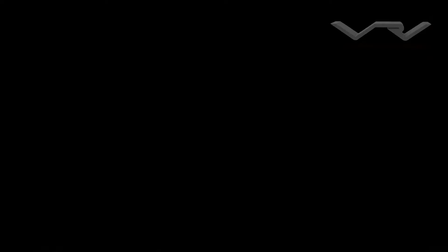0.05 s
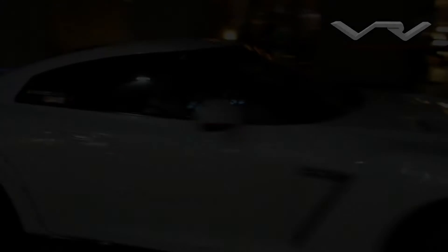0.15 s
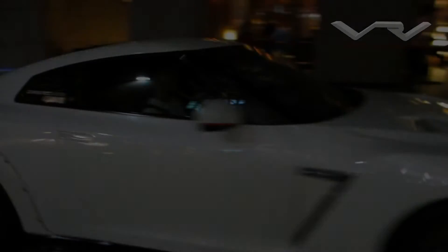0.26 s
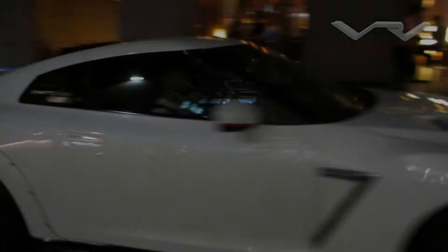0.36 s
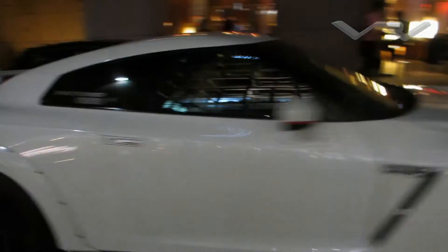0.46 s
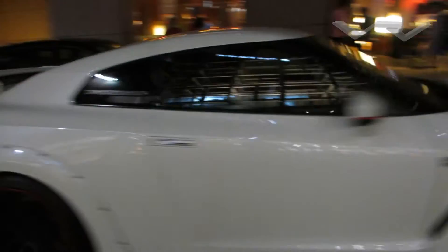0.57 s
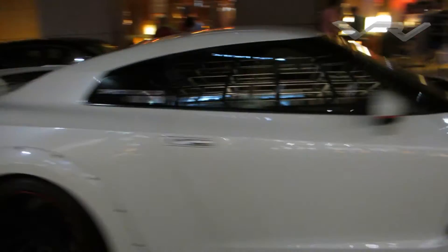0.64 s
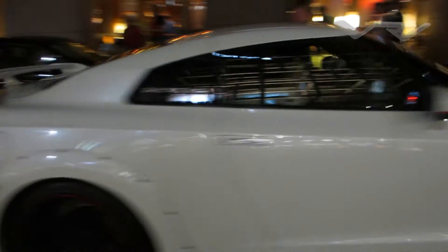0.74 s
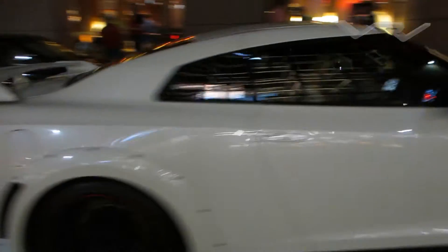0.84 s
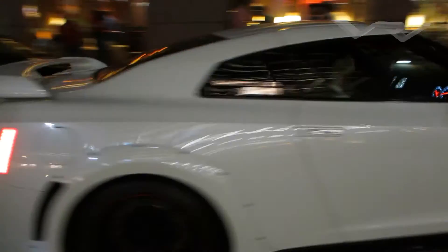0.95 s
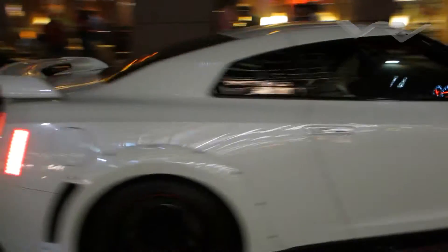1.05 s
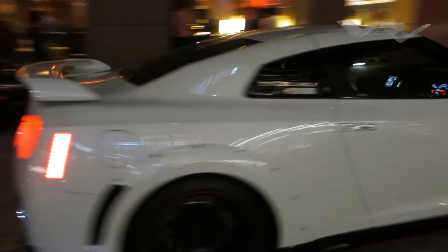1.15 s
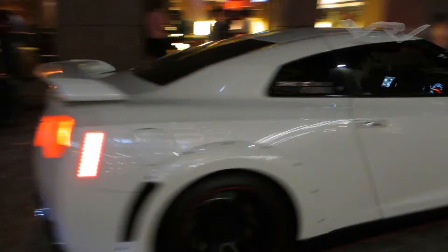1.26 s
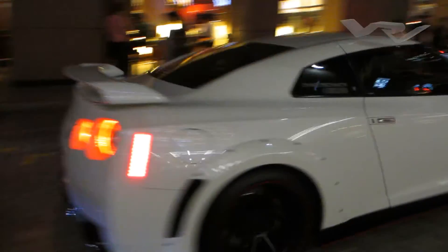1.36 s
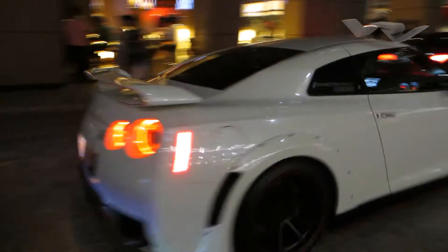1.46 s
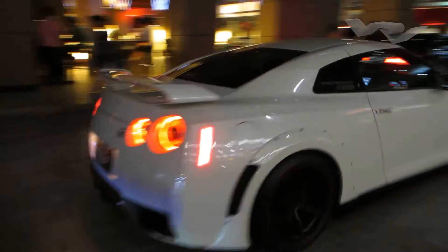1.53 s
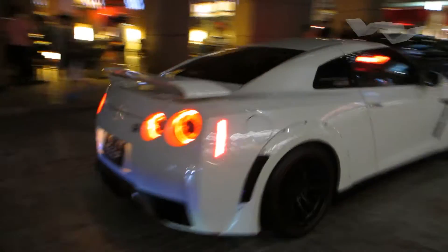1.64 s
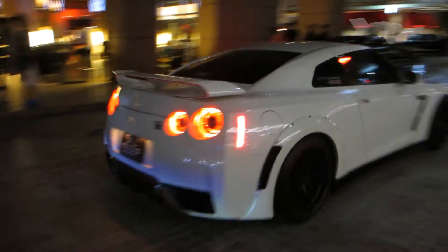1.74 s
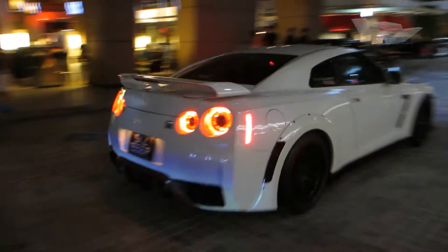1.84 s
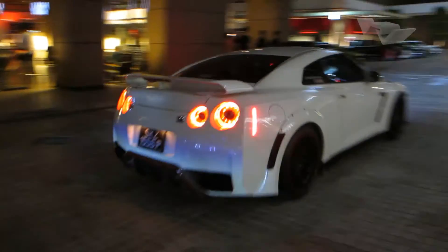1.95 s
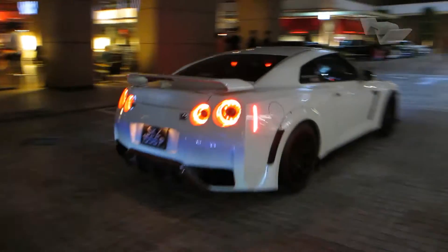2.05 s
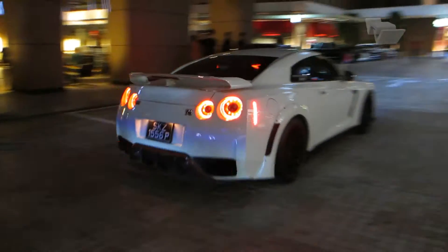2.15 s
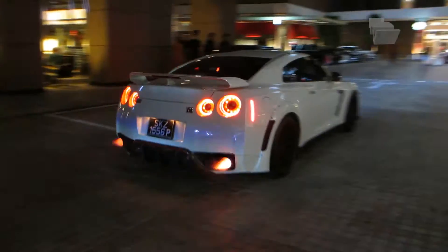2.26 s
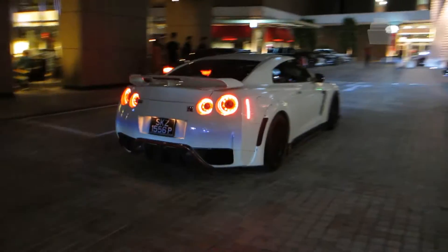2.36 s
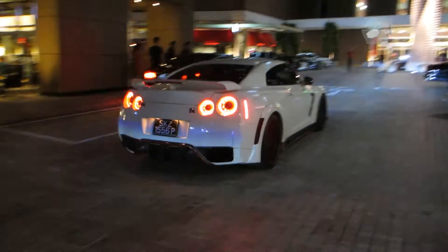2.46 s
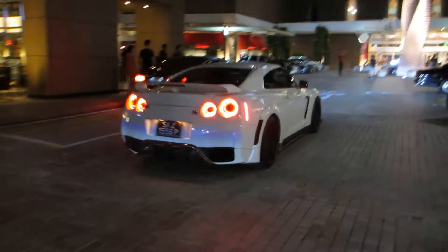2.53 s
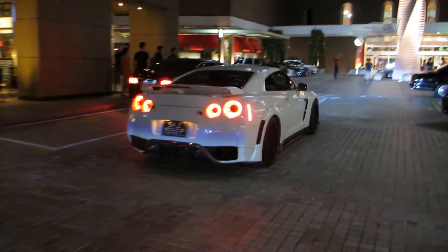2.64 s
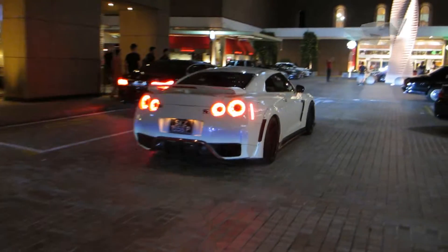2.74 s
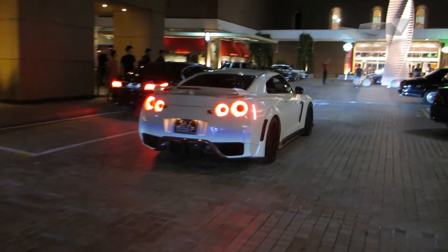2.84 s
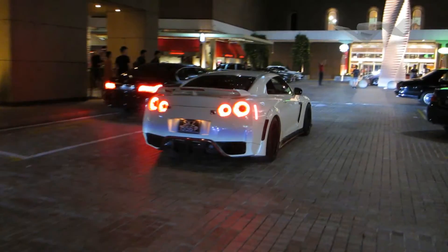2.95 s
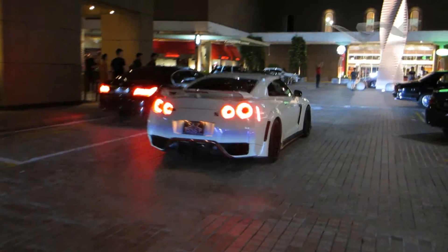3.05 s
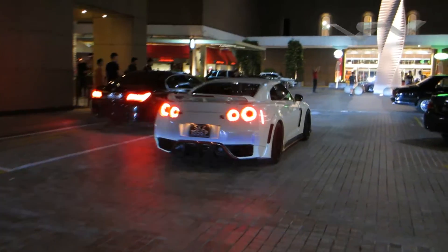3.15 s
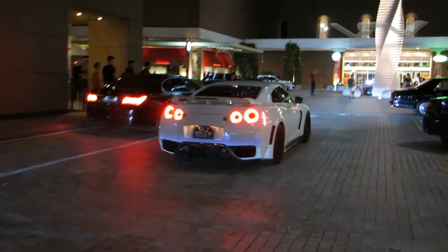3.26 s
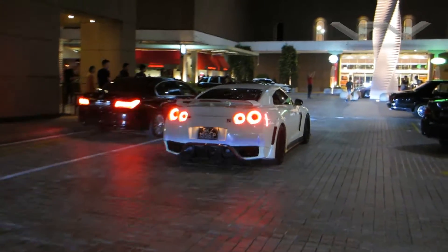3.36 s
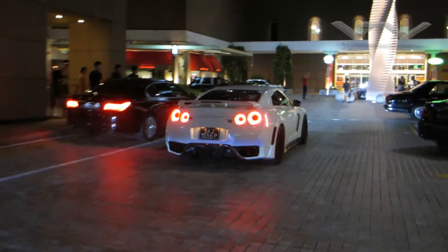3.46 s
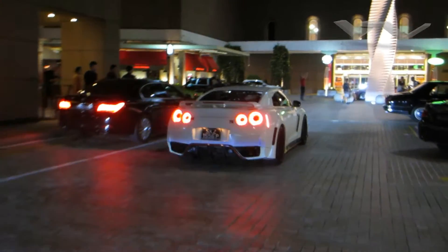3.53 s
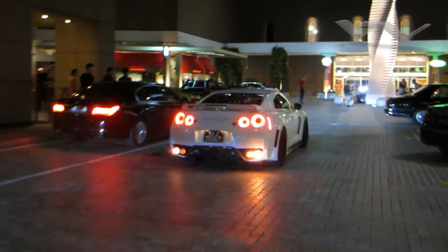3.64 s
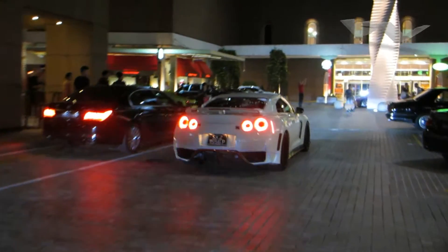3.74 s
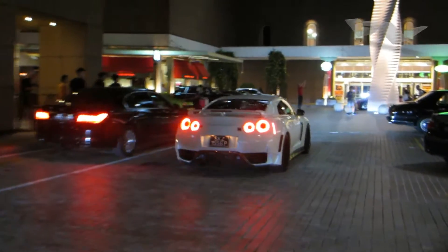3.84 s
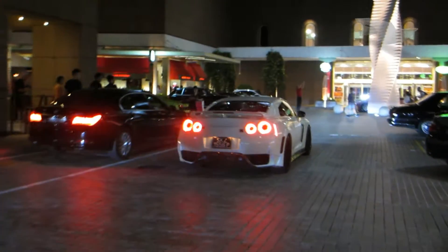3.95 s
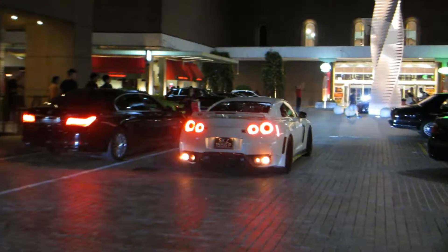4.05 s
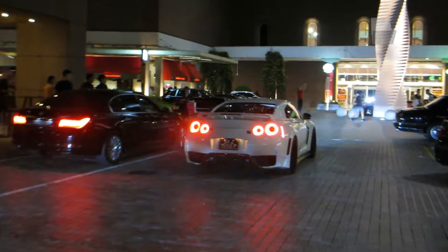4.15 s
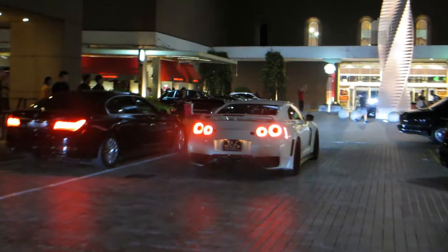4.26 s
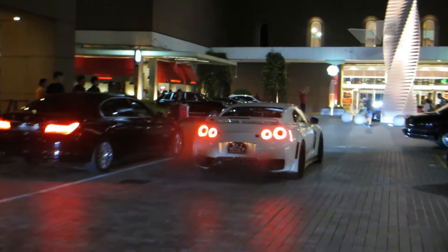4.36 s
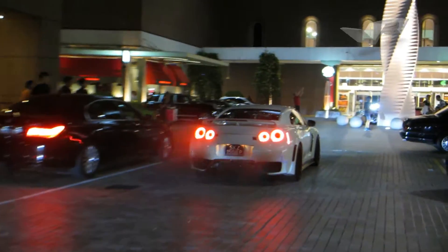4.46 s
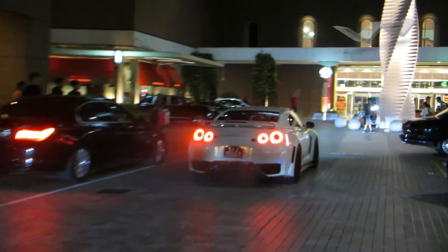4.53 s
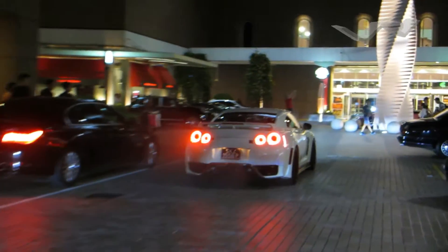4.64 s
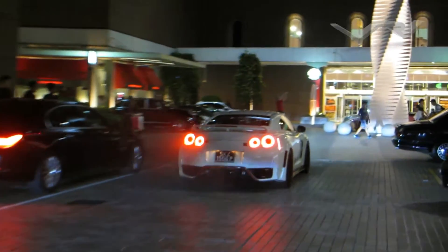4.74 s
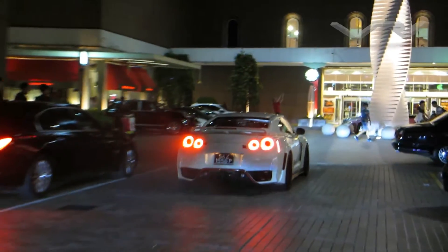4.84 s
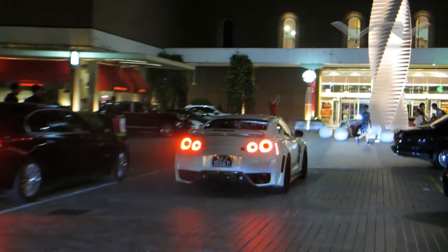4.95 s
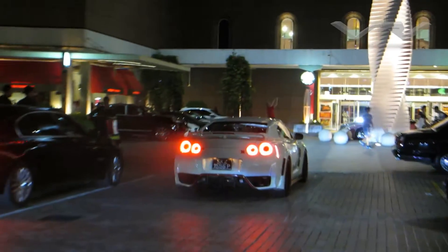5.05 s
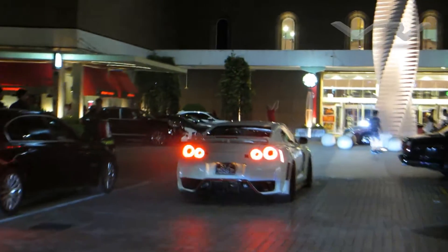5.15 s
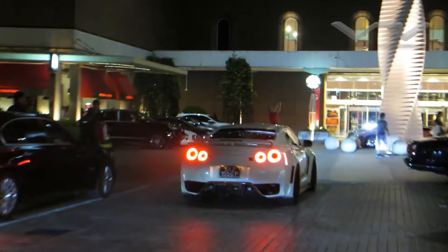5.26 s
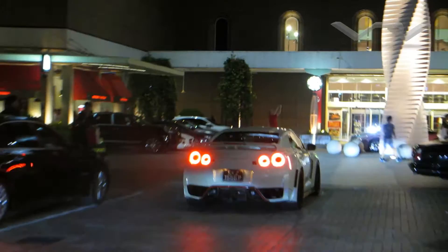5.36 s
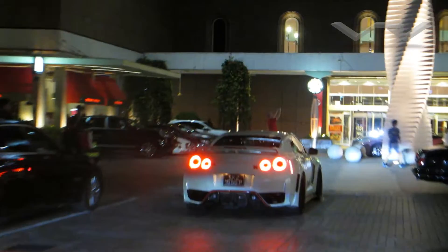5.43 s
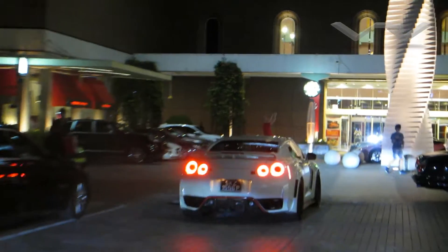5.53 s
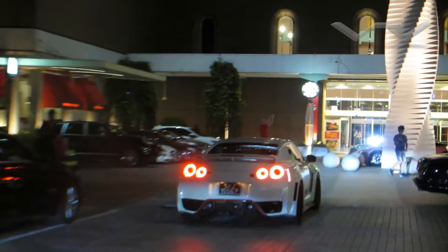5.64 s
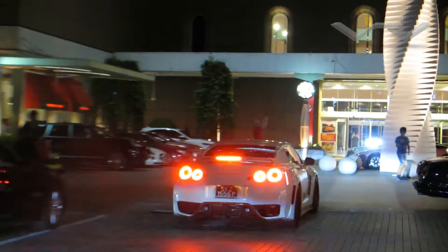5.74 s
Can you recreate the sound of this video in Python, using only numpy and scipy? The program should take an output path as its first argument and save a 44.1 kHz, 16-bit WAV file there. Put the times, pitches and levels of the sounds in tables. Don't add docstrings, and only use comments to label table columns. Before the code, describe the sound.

Silence until about 0.4 s, then a low, lumpy burble fades in over half a second: a turbocharged six-cylinder car creeping close by on paving, with soft tyre hiss and tiny grit ticks around 1 s. From 1 s the revs dip low with a boom, then climb into a hoarse, pulsing, metallic note, peaking near 1.85 s. The throttle lifts and pops and bangs tumble out until 2.45 s, the sharpest cracks at 2.16 and 2.32 s, ringing off buildings. Echoes sink; from 2.7 s a hollower second rev builds to 3.5 s. A longer volley follows, 3.55 to 4.4 s, with heavy bangs near 3.77, 3.9, 4.1 and 4.3 s and hissing gas. A short blip at 4.5 s carries small pops and a thin, high turbine whistle. It recedes to a faint hum, with weak pops and another distant engine near 5.7 s. Small camera, close stereo, clipped peaks.

```python
import sys
import numpy as np
from scipy import signal
from scipy.fft import rfft, irfft, next_fast_len
from scipy.io import wavfile
from scipy.ndimage import uniform_filter1d

SR = 44100
rng = np.random.default_rng(int(sys.argv[2]) if len(sys.argv) > 2 else 0)


def gain_from_decibels(decibels):
    exponent = np.asarray(decibels, float) / 20
    return 10 ** exponent


def output_pcm(signal):
    pcm = np.clip(np.atleast_2d(signal).T, -1, 1) * 32767
    wavfile.write(sys.argv[1], SR, np.round(pcm).astype(np.int16))


N = 255559
T = np.arange(N) / SR


def unit(x):
    return x / np.sqrt(np.mean(x ** 2))


def over_hz(table, hz):
    f, v = np.transpose(table)
    return np.interp(np.log(hz + 1e-9), np.log(f), v)


def over_time(table, rest):
    s, *columns = np.transpose(table)
    return [np.interp(T, s, column, rest, rest) for column in columns]


def shape(x, response):
    size = next_fast_len(N + SR)
    f = np.arange(size // 2 + 1) * SR / size
    return irfft(rfft(x, size) * response(f), size)[..., :N]


def noise_through(response):
    return unit(shape(rng.standard_normal(N), response))


def coloured(table):
    return noise_through(lambda f: gain_from_decibels(over_hz(table, f)) * (f > table[0][0]))


def walk(rate):
    hold = int(SR / rate)
    steps = np.repeat(rng.standard_normal(N // hold + 1), hold)
    return 1.174 * uniform_filter1d(uniform_filter1d(steps, hold), hold)[:N]


def resonance(f, hz, width):
    return 1j * f * width / (hz ** 2 - f ** 2 + 1j * f * width)


# pitch_hz, width_hz, level_db
PIPE = [(150, 96, -6), (346.8, 53.2, -0.5), (582, 69, -2.5), (760, 424, -19.5)]
# pitch_hz, width_hz, level_db
TIPS = [(734.5, 97, 3), (1156, 270, -4), (2640, 340, -17)]


def pipe(f, modes=PIPE):
    rings = sum((-1) ** k * gain_from_decibels(db) * resonance(f, hz, width) for k, (hz, width, db) in enumerate(modes))
    return rings / (1 + 1j * f / 3000) ** 2


def tips(f):
    return pipe(f, TIPS)


# time_s, firing_rate_hz, level_db
CRUISE = [(0.39, 101.4, -30), (0.526, 101.3, -28), (0.75, 100.3, -23.5), (0.85, 103.8, -23),
          (0.92, 106.7, -23), (0.99, 109, -21), (1.03, 107, -27.5), (1.07, 111.5, -47)]
# multiple of the firing rate, level_db
CRUISE_ORDERS = [(.5, -11.5), (1, 1.5), (1.5, -7), (2, -7), (2.5, -2), (3, -6.5), (3.5, -18), (4, -30.5)]


def cruise():
    hz, db = over_time(CRUISE, -140)
    phase = 2 * np.pi * np.cumsum(np.abs(hz) * (1 + .009 * walk(30))) / SR
    note = np.zeros(N)
    for k, order_db in CRUISE_ORDERS:
        flicker_db = 2.2 * walk(22)
        note += np.sqrt(2) * gain_from_decibels(db + order_db + flicker_db) * np.cos(k * phase - 0.3 * k * k)
    return note


# time_s, roar_db, misfire (0 to 1)
ROAR = [(0.39, -33, 0.87), (0.7, -35, 0.84), (1.03, -42, 0.9), (1.26, -36, 0.4), (1.51, -36, 0.3),
        (1.85, -34, .75), (1.9, -34, 0.97), (2.1, -33.5, 0.65), (2.4, -35.5, 0.29), (2.72, -43, 0.66),
        (3.25, -43, 0.7), (3.47, -43.5, .95), (3.6, -36, 0.7), (3.9, -35.5, 1), (4.12, -42, 0.99),
        (4.33, -36, 0.95), (4.46, -39, 0.94), (4.6, -37, 0.91), (4.8, -42.5, 0.72), (5.13, -51, 0.85),
        (5.79, -57, 0.7)]
# frequency_hz, level_db (per Hz)
HISS = [(880, -33.5), (1500, 1.5), (1620, 0), (2210, -4.5), (4460, -21.5), (6730, -23), (7000, -27),
        (9100, -26.5), (15400, -120)]


def roar():
    roar_db, misfire = over_time(ROAR, -140)
    kicks = (rng.random(N) < 500 / SR) * rng.standard_normal(N)
    kicks = (kicks + 0.19 * rng.standard_normal(N)) * gain_from_decibels(2.0 * walk(30))
    ring = unit(shape(kicks, pipe))
    rasp = unit(shape(kicks, tips)) * gain_from_decibels(roar_db - 37 + 39.5 * misfire)
    drone = unit(shape(kicks, lambda f: resonance(f, 578, 26))) * np.clip((T - 4.75) / 0.17, 0, 1)

    side = 1 / (1 + np.exp((T - 0.92) / 0.032))
    lugging = np.exp(-((T - 1.06) / 0.15) ** 2)
    boom = noise_through(lambda f: resonance(f, 69.4, 30) ** 2)
    boom = boom * (gain_from_decibels(-48) + gain_from_decibels(-32.5) * side + gain_from_decibels(-24) * lugging)

    heat = np.zeros(N)
    heat[[int(s * SR) for s, *_ in BANGS_2]] = [gain_from_decibels(2 * (crack_db - 14)) for *_, crack_db in BANGS_2]
    glow_t60_s = 1.36
    glow = np.sqrt(signal.lfilter([1], [1, -gain_from_decibels(-120 / glow_t60_s / SR)], heat))
    gone_db = -7 * np.maximum(T - 5.15, 0)
    hiss_gain = gain_from_decibels(-60.5 - T + gone_db) + gain_from_decibels(-54) * side + glow * gain_from_decibels(gone_db)
    hiss = coloured(HISS) * hiss_gain * gain_from_decibels(walk(44) + 2 * walk(9))
    return (ring + gain_from_decibels(-6) * drone) * gain_from_decibels(roar_db + 5.5) + rasp + boom + hiss


# start_s, peak_db
TICKS = [
    (0.7845, -31),
    (0.9939, -29),
    (1.035, -38.5),
    (1.043, -37.5),
    (1.0522, -28),
    (1.062, -38),
    (1.069, -36.5),
    (1.1102, -36),
    (1.4703, -32.5),
    (5.4493, -33.5),
]


def tyres():
    grit = np.zeros(N)
    for s, db in TICKS:
        grit[int(s * SR)] = gain_from_decibels(db - 2.5)
    tread = noise_through(lambda f: resonance(f, 12000, 4500))
    rolling = gain_from_decibels(-76 - 48 * np.maximum(T - 4.95, 0))
    passing = gain_from_decibels(-68.5) * np.exp(-((T - 0.75) / 0.27) ** 2)
    return shape(grit, lambda f: resonance(f, 7000, 9000)) + tread * (rolling + passing)


# pitch_hz, width_hz, level_db
THROAT = [(600, 120, 3), (860, 150, 2.5), (1290, 150, -3)]


def fronts(x):
    push_s = .00028

    def throat(f):
        rings = sum(gain_from_decibels(db) * resonance(f, hz, width) for hz, width, db in THROAT)
        return rings * np.exp(-(2 * np.pi * f * push_s) ** 2 / 8)

    rung = -12 * shape(x, throat)
    passed = signal.sosfilt(signal.butter(6, 1430, fs=SR, output="sos"), rung)
    return passed + gain_from_decibels(-18) * rung


# start_s, peak_db
STROKES = [(1.186, -28), (1.228, -27), (1.301, -23), (1.362, -24), (1.431, -24), (1.48, -22), (1.504, -20),
           (1.5505, -14), (1.595, -14), (1.645, -17), (1.687, -15), (1.72, -15), (1.749, -14), (1.797, -11),
           (1.833, -10), (1.866, -14), (3.309, -40), (3.343, -39), (3.377, -35), (3.414, -35), (3.45, -33),
           (3.484, -33), (3.515, -34)]


def strokes():
    x = np.zeros(N)
    rev_s, rev_hz = np.transpose(REV_1 + REV_2)[:2]
    nth = np.arange(5)
    for s, db in STROKES:
        at = ((s + nth / np.interp(s, rev_s, rev_hz)) * SR).astype(int)
        scatter_db = 1.5 * rng.standard_normal(5) * (nth > 0)
        x[at] += gain_from_decibels(db + 6.5 - 3.2 * nth + scatter_db)
    gas = signal.lfilter([1], [1, -np.exp(-1 / (0.0018 * SR))], x) * rng.standard_normal(N)
    return fronts(x + .06 * gas)


def surge():
    starts = np.transpose(STROKES)[0]
    since = T - starts[np.maximum(np.searchsorted(starts, T) - 1, 0)]
    gain = .3 + 1.5 * np.exp(-np.abs(since) / .018)
    return gain * (since > 0) * (since < .075)


# frequency_hz, level_db
SILENCER = [(52, 10.5), (68, 4.5), (95, -1), (170, 1), (260, 4.5), (345, 4), (450, -15.5), (590, 2.5)]


def orders(table, second_db, third_db, upper_db, half_db, roll_db, floor, rasp_db, flicker_db, wobble,
           tips_db=-60, surging=False, fourth_db=-80, paired=False):
    s, *columns = np.transpose(table)
    on = (T >= s[0]) & (T < s[-1])
    hz, db, load_db = (np.interp(T[on], s, column) for column in columns)
    lows_db = {1: db, 2: db + second_db + 0.93 * load_db, 3: db + third_db + 0.84 * load_db}
    upper_db = db + upper_db + load_db
    phase = 2 * np.pi * np.cumsum(hz * (1 + wobble * walk(40)[on])) / SR
    cycle = phase / 6
    if paired:
        lump = .3 + np.exp(1.2 * (np.cos(2 * cycle + 1.1) - 1))
    else:
        lump = .7 + .8 * np.exp(2.5 * (np.cos(cycle) - 1))
    hard = surge()[on] * surging
    lump = uniform_filter1d(uniform_filter1d(np.where(hard > 0, hard, lump), size=40), size=40)

    flicker = walk(25.01)
    tones, puffs = np.zeros((2, N))
    for k in np.arange(.5, 9.1, .5):
        if k in (1, 2, 3):
            gain = gain_from_decibels(lows_db[int(k)] + over_hz(SILENCER, k * hz))
        else:
            body = np.abs(pipe(k * hz, PIPE[1:])) ** 1.89 * gain_from_decibels(-roll_db * max(k - 4, 0))
            body = np.maximum(body, floor * (1 < k < 3))
            bright = gain_from_decibels(tips_db - 1.76 * (k - 7.0)) * np.abs(tips(k * hz)) * (k > 3)
            gain = gain_from_decibels(upper_db + half_db * (k % 1 > 0)) * (body + bright) * lump
        if k == 2:
            gain = gain / (1 + (147 / (k * hz)) ** 12)
        if k == 4:
            gain = gain + gain_from_decibels(db + fourth_db) * np.exp(-((k * hz - 265) / 45) ** 2)
        unsteady = gain_from_decibels(flicker_db * np.roll(flicker, int(k * SR / 3))[on])
        tones[on] += np.sqrt(2) * gain * unsteady * np.cos(k * phase + np.pi - 0.13 * k * k)

    puff = np.exp(4 * (np.cos(phase) - 1)) * (1 + 0.058 * np.cos(phase / 2))
    puffs[on] = lump * gain_from_decibels(upper_db + rasp_db) * (hz / 150) ** 2 * puff
    edge = np.clip(np.minimum(T - s[0], s[-1] - T) / 0.0052, 0, 1)
    return tones * edge + shape(puffs * edge * (1.9 + rng.standard_normal(N)), tips)


# time_s, firing_rate_hz, level_db, load_db (gain of the higher orders)
REV_1 = [(0.94, 54.83, -31, -5), (1.039, 65.48, -19, -13), (1.135, 88.1, -30, -4),
         (1.301, 110.7, -26.5, -6), (1.478, 117.5, -25.5, -9), (1.565, 133.5, -28, 0),
         (1.749, 153.9, -30, -4), (1.849, 181.5, -22.5, -2.5), (1.895, 179, -51, -3)]
REV_2 = [(2.55, 172.3, -56.5, -10.5), (2.627, 171.5, -48, 7), (2.9, 153.8, -35.5, -2.5),
         (3.029, 141.5, -36, 0), (3.09, 142.2, -32, -1), (3.15, 145, -30.5, 5), (3.35, 158, -30, 14),
         (3.454, 174.7, -28.5, 20.5), (3.523, 198, -30.5, 11.5), (3.544, 198, -45, -1)]
OVERRUN_1 = [(1.88, 180, -46, 0), (2.0, 170, -47, 0), (2.15, 178, -46, 0), (2.5, 180, -49, 0),
             (2.6, 178, -53, 0)]
OVERRUN_2 = [(3.53, 192, -36, 0), (3.65, 188, -44, 0), (3.8, 196, -47, 0), (4.1, 202, -48, 0),
             (4.3, 200, -54, 0)]
BLIP = [(4.44, 107.3, -40, -20), (4.542, 132.7, -28, -5), (4.616, 160.7, -33.5, 5),
        (4.678, 175.5, -38, 12.5), (4.804, 176.9, -61.5, 21.5), (4.956, 155.7, -43, -10.5),
        (5.18, 150, -46.5, 0), (5.242, 135.4, -43.5, -1), (5.55, 99.9, -56.5, 4.5)]
NEIGHBOUR = [(5.42, 152.6, -50.5, -6), (5.6, 154.1, -63, 2), (5.688, 158.3, -49, 7),
             (5.79, 159.5, -57.5, 8)]


def engine():
    note = orders(REV_1, second_db=6.5, third_db=1.0, upper_db=3.0, half_db=-15.5, roll_db=1.5, floor=0.28,
                  rasp_db=9.5, flicker_db=1.3, wobble=.005, tips_db=-13, surging=True, fourth_db=-5.5)
    note += orders(REV_2, second_db=-13, third_db=-3.5, upper_db=7.0, half_db=-17.0, roll_db=18.0, floor=0.025,
                   rasp_db=-29, flicker_db=1.3, wobble=.005, tips_db=-43, surging=True, paired=True)
    for table in OVERRUN_1, OVERRUN_2:
        note += orders(table, second_db=5, third_db=-8, upper_db=-8, half_db=-4, roll_db=6, floor=.4,
                       rasp_db=3, flicker_db=5, wobble=.04)
    note += orders(BLIP, second_db=-9.5, third_db=-6.5, upper_db=-0.5, half_db=3.0, roll_db=-4.5, floor=0.098,
                   rasp_db=-4.0, flicker_db=-1.0, wobble=0.012)
    note += orders(NEIGHBOUR, second_db=-0.5, third_db=-4, upper_db=1.0, half_db=-5.5, roll_db=20.0, floor=1.0,
                   rasp_db=-11, flicker_db=4.5, wobble=0.007)
    return note


# start_s, peak_db, ring_hz, burn_s
POPS = [(1.893, -9.5, 795, 0.0058), (1.952, -8.5, 420, 0.0036), (1.972, -18, 803, .006),
        (2.003, -17.5, 359, .009), (2.067, -13, 382, 0.012), (2.117, -18, 356, .01),
        (2.104, -15.5, 710, 0.011), (2.137, -11.5, 410, 0.011), (2.2, -11.5, 420, 0.014),
        (2.245, -15, 530, 0.0067), (2.28, -9, 400, 0.0056), (2.371, -18, 381, .009),
        (2.397, -19.5, 399, 0.014), (2.431, -23.5, 650, .008), (3.007, -23, 565, 0.021),
        (3.376, -21, 627, 0.0094), (3.414, -12.5, 620, 0.0081), (3.555, -18, 606.4, 0.0096),
          (3.575, -6, 563, 0.0088), (3.623, -20, 594, 0.0031), (3.676, -9, 610, 0.012),
          (3.694, -13.5, 659, 0.0089), (3.725, -30.5, 640, 0.0048), (3.756, -10.5, 590, 0.006),
          (3.952, -21.5, 533, 0.013), (4.119, -9.5, 570, 0.0097), (4.154, -11.5, 970, .005),
          (4.164, -19, 700, .004), (4.177, -12.5, 600, 0.003), (4.198, -19.5, 656, 0.0061),
          (4.253, -21, 694, 0.0093), (4.281, -35, 470, 0.0039), (4.307, -15, 1160, 0.0031),
          (4.328, -10, 880, 0.0034), (4.352, -7, 338, 0.0062), (4.407, -22.5, 540, 0.017),
          (4.431, -29, 656, 0.0051), (4.45, -25, 450, 0.005), (4.484, -18.5, 695, 0.016),
          (4.536, -15, 785, 0.0078), (4.554, -19, 760, 0.012), (4.58, -15.5, 550, 0.0093),
          (4.618, -17, 710, 0.011), (4.654, -33, 540, 0.01), (4.722, -20.5, 386, 0.0091),
          (4.758, -31, 610, 0.0088), (4.835, -31, 600, 0.026), (4.976, -25, 580, 0.0087),
          (5.002, -36, 550, 0.0089), (5.09, -42, 1122, 0.043), (5.191, -32, 560, 0.0082),
          (5.21, -28, 623, 0.011), (5.298, -34, 590, 0.023), (5.459, -29.5, 610, 0.013),
          (5.54, -29, 625, 0.013), (5.577, -28.5, 652, 0.035), (5.679, -21, 634, 0.0153),
          (5.691, -25, 600, 0.015)]
# start_s, peak_db, ring_hz, burn_s, crack_db
BANGS_1 = [(1.798, -13.5, 816, 0.0043, -58.5), (1.832, -14.5, 709, 0.021, -50.5),
           (1.895, -13.5, 813, 0.0039, -41), (1.9275, -3.5, 353, 0.0055, -48),
           (1.934, -23.5, 692, .008, -46), (1.955, -10, 890, 0.011, -41.5), (1.992, -18.5, 401, 0.012, -60),
           (2.022, -12, 1340, 0.007, -37), (2.027, -15, 762, 0.011, -46.5),
           (2.161, -2, 1331, 0.0068, -27.5), (2.169, -10.5, 488, 0.0093, -48),
           (2.196, -12.5, 1250, 0.0094, -36.5), (2.318, 0.5, 467, 0.0045, -27.5),
           (2.321, -9.5, 504, 0.012, -45), (2.329, -5.5, 692, 0.0062, -39.5)]
BANGS_2 = [(3.45, -19.5, 590, 0.011, -57), (3.484, -19.5, 533, 0.012, -49.5),
           (3.514, -14, 582, 0.014, -52.5), (3.642, -8, 685, 0.0084, -51), (3.7655, 0.5, 603, 0.014, -33),
           (3.796, -11, 724, 0.0081, -49), (3.808, -23, 587, 0.0096, -41.5), (3.838, -6, 600, 0.0067, -39),
           (3.876, -1, 624, 0.004, -36.5), (3.882, -6.5, 708, 0.0047, -34),
           (3.915, -5.5, 660, 0.0086, -37.5), (4.096, -1.5, 653, 0.0083, -37),
           (4.112, -1.5, 517, 0.0081, -33), (4.137, -20.5, 810, 0.022, -43.5),
           (4.2939, 1, 612, 0.0068, -30.5), (4.318, -11, 1210, 0.0059, -38), (4.334, -18, 960, 0.011, -41)]


def pops():
    ring, blast, thump, shock, spit = np.zeros((5, N + SR))
    t = np.arange(SR // 20) / SR
    for s, db, hz, burn, *crack in POPS + BANGS_1 + BANGS_2:
        thump_db = db - 16 + 21.5 * np.log(burn / 0.0079)
        lifted = 1.88 < s < 2.6 or 3.53 < s < 4.47
        if not lifted:
            thump_db -= 15
        at = slice(int(s * SR), int(s * SR) + len(t))
        burning = np.exp(-(t / burn) ** 2) * (1 - np.exp(-t / .0004))
        ring[at] -= gain_from_decibels(db) * burning * np.sin(2 * np.pi * hz * t * (1 - 8 * t))
        shock[at.start + 20] += gain_from_decibels(db - 10.5)
        spit[at] += gain_from_decibels(db + (0 if crack else -6)) * burning
        blast[at] += gain_from_decibels(db) * burning
        thump[at] -= gain_from_decibels(thump_db) * np.exp(-t / 0.0098) * np.sin(2 * np.pi * 110 * t)
    gas, rasp = np.array([blast[:N], spit[:N]]) * rng.standard_normal(N)
    blast = gain_from_decibels(10.0) * shape(gas, pipe) + gain_from_decibels(16.0 - 4.77 * T) * shape(rasp, tips)
    return 0.49 * ring[:N] + fronts(shock[:N]) + blast + gain_from_decibels(-2.0) * thump[:N]


# frequency_hz, level_db (per Hz)
CRACK = [(530, 9), (900, 1), (1460, 0), (2260, -7.5), (2920, -10), (4570, -20), (6740, -20.5), (11900, -18),
         (15400, -27.5), (16400, -59)]
# pitch_hz, width_hz, build_up_s, t60_s, level_db
FLUTTER = [(2260, 1500, 0.0033, 1, -12), (5500, 8000, 0.04, 0.77, -19.5), (10430, 2900, 0.045, 0.76, -18),
           (14600, 3500, .045, .55, -23.5)]


def flame():
    size, fierce = np.zeros((2, N + SR))
    t = np.arange(SR) / SR
    for s, _, _, burn, crack_db in BANGS_1 + BANGS_2:
        at = slice(int(s * SR), int(s * SR) + SR)
        burst = gain_from_decibels(crack_db) * np.exp(-(t / burn) ** 1.39)
        size[at] += burst
        fierce[at] += burst * np.clip((crack_db + 51.5) / 16, 0, 1)
    crack = coloured(CRACK)
    dull = shape(crack, lambda f: 1 / (1 + (f / 4500) ** 4))
    out = gain_from_decibels(13.0) * (size[:N] * dull + fierce[:N] * (crack - dull))
    for hz, width, build, t60, db in FLUTTER:
        echo = gain_from_decibels(-120 * t / t60) * np.clip(t / build, 0, 1) ** 2 / (0.026 * SR)
        tail = np.sqrt(np.abs(signal.fftconvolve(fierce[:N] ** 2, echo)[:N]))
        out = out + gain_from_decibels(db) * tail * noise_through(lambda f: resonance(f, hz, width) ** 2)
    return out


# time_s, pitch_hz, level_db
WHISTLE = [
    [(4.555, 6500, -80), (4.576, 6500, -63), (4.68, 6500, -70), (4.71, 6500, -76), (4.95, 6550, -88)],
    [(5.42, 5500, -95), (5.5, 5500, -80), (5.58, 5520, -95)],
]


def whistle():
    out = np.zeros(N)
    for table in WHISTLE:
        hz, db = over_time(table, -140)
        phase = 2 * np.pi * np.cumsum(hz * (1 + 0.016 * walk(460))) / SR
        out += np.sqrt(2) * gain_from_decibels(db + 3 * walk(52)) * np.sin(phase)
    return out


# pitch_hz, t60_s, level_db
YARD = [(150, 1, -10), (590, 0.56, -11.5), (1000, .3, -13.5), (1750, 0.94, -10.5)]


def walls(x):
    t = np.arange(SR) / SR
    f = np.arange(SR // 2 + 1)
    tail = 0
    for hz, t60, db in YARD:
        band = irfft(rfft(rng.standard_normal((2, SR))) * np.abs(resonance(f, hz, hz * 1.6)), SR)
        tail = tail + band * gain_from_decibels(db - 60 * t / t60) / np.sqrt(t60 * SR / 14)
    tail = tail * np.clip((t - .006) / 0.0046, 0, 1)
    return signal.fftconvolve(x[None], tail, axes=1)[:, :N]


# frequency_hz, level_db
PORT_DB = [(60, -14), (110, -14.5), (200, -13), (380, -14), (700, -12), (1290, -15), (2380, -11),
           (4400, -12), (8120, -10.5), (15000, -10)]
# frequency_hz, phase_rad
PORT_RAD = [(30, -3.3), (260, -3.6), (500, -4.5), (1200, -5.6), (5000, -6), (11000, -6.5), (13400, -7),
            (16000, -10)]


def scene():
    note = cruise() + engine() + strokes()
    bangs = pops()
    yard = walls(bangs + .9 * note)
    car = note + bangs + flame() + roar() + tyres() + whistle() + yard[0]

    def turn(f):
        return np.exp(1j * over_hz(PORT_RAD, f))

    def left_port(f):
        return gain_from_decibels(over_hz(PORT_DB, f)) * turn(f)

    right = shape(car, lambda f: 2 / np.abs(1 + left_port(f)))
    other = shape(2 * yard[1] + flame() + roar(), lambda f: 2.2 * gain_from_decibels(over_hz(PORT_DB, f)) * f / (f + 300))
    left = shape(right, left_port) + other + gain_from_decibels(-19) * shape(bangs, turn)
    return np.array([left, right])


def roll_off(x):
    return signal.sosfilt(signal.butter(12, 16500, fs=SR, output="sos"), x)


def record(dry):
    x = signal.sosfilt(signal.butter(2, 28, "high", fs=SR, output="sos"), dry)
    x = x * np.clip((T - 0.33) / 0.65, 0, 1) ** 1.42 * (T > .385)
    x = np.clip(1.25 * np.tanh(x / 1.25), -1, 1)
    x = signal.sosfilt(signal.ellip(8, .2, 70, 16100, fs=SR, output="sos"), x)
    return roll_off(x)


dry = scene()
out = record(dry)
output_pcm(out)
```